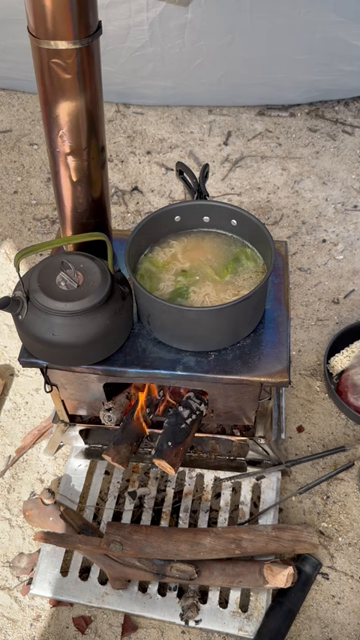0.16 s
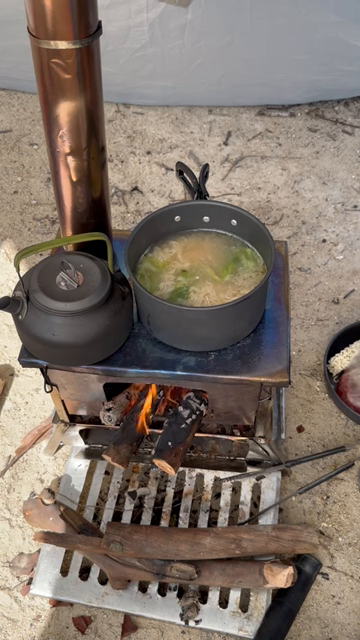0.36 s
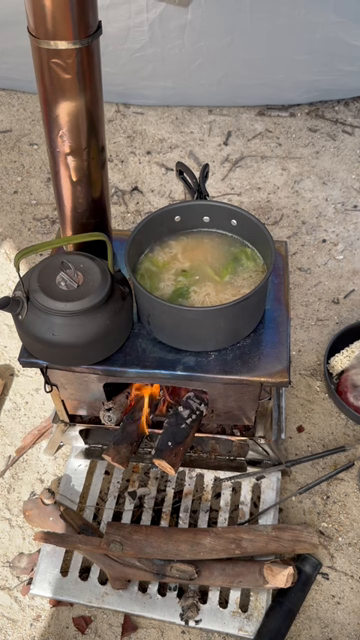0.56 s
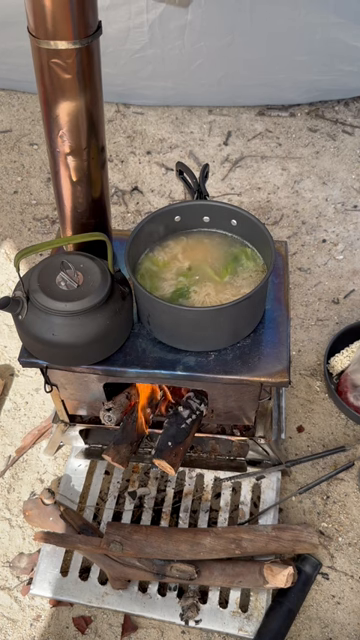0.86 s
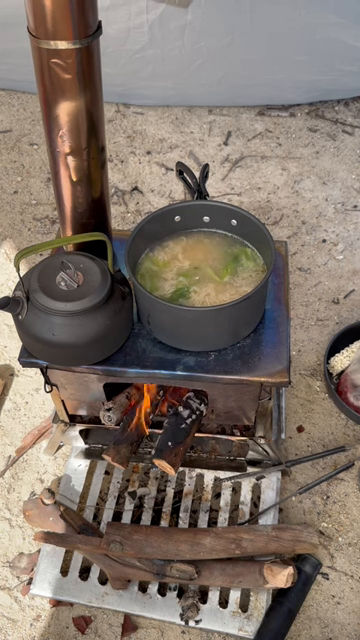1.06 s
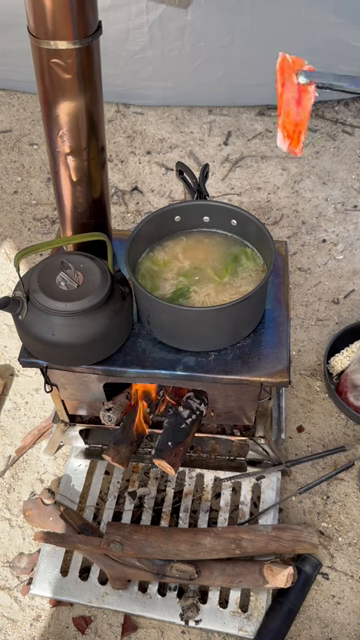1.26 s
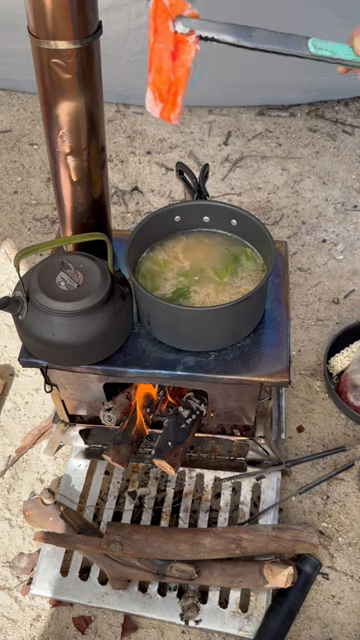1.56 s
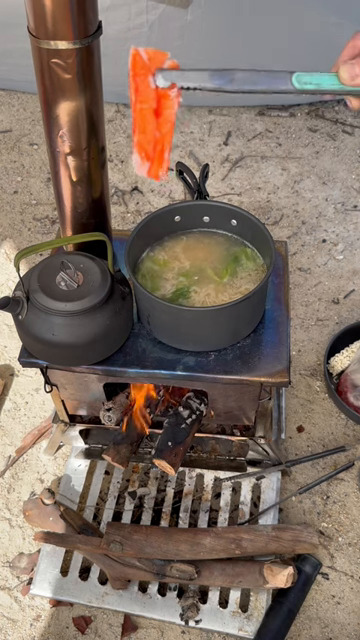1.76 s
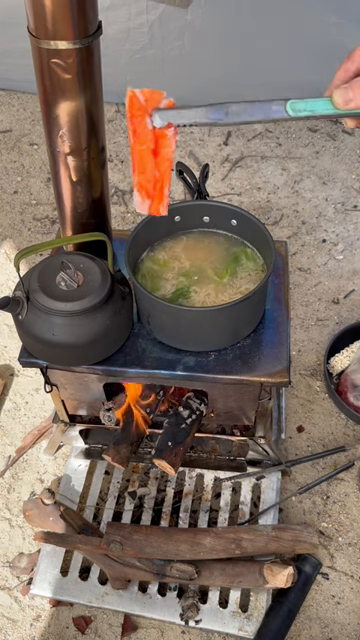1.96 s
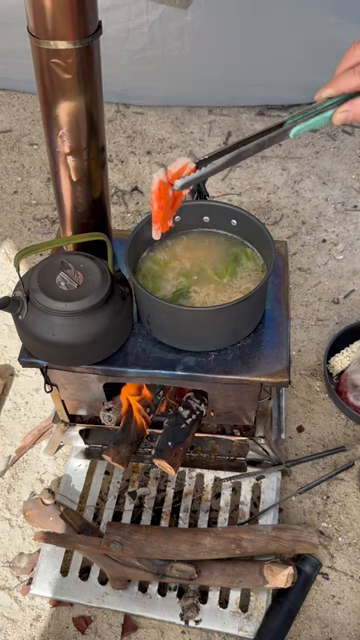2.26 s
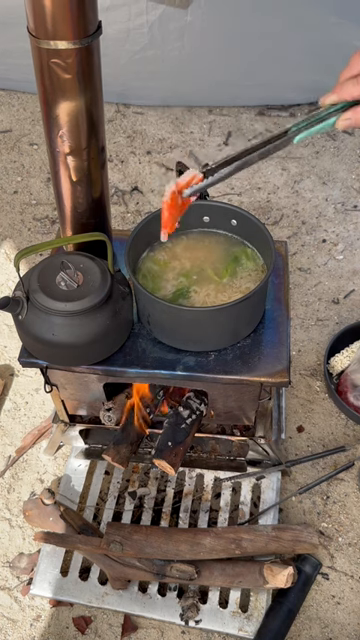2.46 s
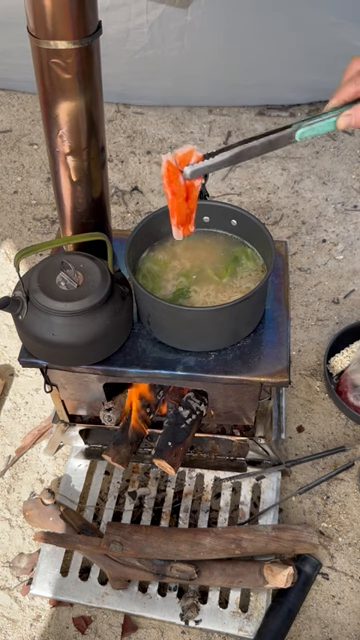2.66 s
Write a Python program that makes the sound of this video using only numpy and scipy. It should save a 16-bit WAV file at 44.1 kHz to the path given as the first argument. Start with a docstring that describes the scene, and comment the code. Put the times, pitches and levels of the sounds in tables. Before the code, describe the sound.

A low, wavering stove-fire roar with a sharp pop near the start, faint ticks and light rustling

```python
"""A low fire roar flutters and hums, cloth swishes, wood pops and ticks, and brief rough tones sound.
A wood fire draws in a small sheet-metal stove inside a tent, a phone held close above it.
Noise bands make the roar and narrow noise the flue hum; clicks over noise make the cloth.
Bursts with a metal ring and a dull tail make the pops; swept sines make the rough tones.
The bass is alike in left and right; the treble differs in phase, likeness and balance."""
import sys
import numpy as np
from scipy import signal
from scipy.fft import rfft, irfft, next_fast_len
from scipy.io import wavfile
from scipy.ndimage import uniform_filter1d

SR = 44100
rng = np.random.default_rng(int(sys.argv[2]) if len(sys.argv) > 2 else 0)


def invert_db(level):
    """Linear amplitude ratio for a level in decibels (20 dB per decade), elementwise."""
    return 10 ** (np.asarray(level, dtype=float) / 20)


def master_out(mix):
    """Clip the mix to full scale and print it as 16-bit PCM to the path in sys.argv[1]."""
    frames = np.transpose(np.atleast_2d(mix))
    ceiling = np.clip(frames, -1, 1)
    pcm = np.round(ceiling * 32767).astype(np.int16)
    wavfile.write(sys.argv[1], SR, pcm)


N = 123479  # samples
T = np.arange(N) / SR
SIZE = next_fast_len(N + SR // 2)  # transform length, with room for filter tails
HZ = np.maximum(np.fft.rfftfreq(SIZE, 1 / SR), 1)
SHARED = np.array([[1], [0]])  # puts a sound in the shared row only, not in its unrelated twin

# level of the rumble as it happens to waver, only its changes count: (t/s, level/dB)
RUMBLE_LEVEL = [(0.0, -39), (0.28, -34.5), (0.3, -34.5), (0.41, -35.5), (0.47, -44.5), (0.54, -38),
                (0.58, -50), (0.63, -34.5), (0.69, -38.5), (0.76, -36.5), (0.89, -36), (0.9, -52),
                (0.94, -41.5), (1.02, -43.5), (1.04, -34.5), (1.16, -46), (1.2, -34), (1.28, -44),
                (1.31, -32.5), (1.36, -53.5), (1.42, -30.5), (1.46, -39), (1.47, -33), (1.63, -35),
                (1.67, -45.5), (1.71, -30), (1.77, -52), (1.81, -40.5), (1.85, -38.5), (1.98, -51.5),
                (2.0, -33), (2.17, -33.5), (2.21, -40), (2.27, -51), (2.31, -37.5), (2.42, -32.5),
                (2.5, -46), (2.51, -41), (2.68, -34.5), (2.8, -51.5)]


def read(table, column, at, scale=np.asarray):
    """One column of a table, joined by straight lines."""
    rows = np.array(table, float)
    return np.interp(scale(at), scale(rows[:, 0]), rows[:, column])


def unit(x):
    """Scale to rms 1."""
    return x / np.sqrt(np.mean(x ** 2))


def shape(x, gain):
    """Filter by a gain for each frequency."""
    return irfft(rfft(x, SIZE) * gain, SIZE)[..., :N]


def colour(table):
    """Gain from (f/Hz, level/dB) points."""
    return invert_db(read(table, 1, HZ, np.log))


def walk(rate):
    """Random levels held 1 / rate s and slewed twice; spread about 0.7."""
    k = int(SR / rate)
    held = np.repeat(rng.standard_normal(N // k + 1), k)
    slewed = uniform_filter1d(uniform_filter1d(held, k), k)
    return 0.99 * slewed[:N]


def roar():
    """Flame noise in overlapping bands that swell together and flutter alone; the bass also wavers."""
    # spectrum of flame roar and the faint hiss above it: (f/Hz, relative level per Hz/dB)
    roar_colour = [(20, -31), (30, -26), (40, -18), (50, -8), (70, -5.5), (100, -8), (150, -13.5),
                   (220, -18.5), (350, -24), (520, -23), (800, -25), (1100, -31), (1500, -41.5),
                   (2200, -49.5), (3000, -49.5), (4500, -54.5), (7000, -52.5), (10500, -58), (12500, -56),
                   (16000, -72)]
    roar_db, swell_db, flutter_db = -40, -0.5, 1.32  # overall rms; dB per unit of walk
    rumble = read(RUMBLE_LEVEL, 1, T)
    rumble = rumble - rumble.mean()
    swell = walk(1.81)
    out = 0
    for hz in 22 * 2 ** np.arange(0, 10, .5):
        octaves = np.clip(np.log2(HZ / hz), -.5, .5)
        band = np.cos(np.pi * octaves) * colour(roar_colour)
        db = swell_db * swell + flutter_db * walk(8.91)
        db = db + 0.35 * rumble * (hz < 90)
        out = out + invert_db(db) * shape(rng.standard_normal((2, N)), band)
    return unit(out) * invert_db(roar_db)


def flue_hum():
    """Air in firebox and flue resonates: narrow noise, its level partly steadied."""
    # air resonances of firebox and flue: (f/Hz, width/Hz, rms level/dB, steadiness 0-1)
    resonances = [(60.9, 14.9, -38.5, 0.66), (130.87, 2.8, -48, 1), (170.8, 5.3, -60, 0),
                  (605.9, 12, -58, 0.53)]
    # how strongly the upper resonances sound, scaled by hum_share below: (t/s, level/dB)
    hum_levels = [(0.0, -67), (0.06, -58.5), (0.28, -66.5), (0.57, -58), (0.78, -59.5), (0.81, -79),
                  (0.88, -63), (1.63, -63), (1.64, -73), (1.75, -59.5), (2.7, -62.5), (2.8, -59)]
    hum_share, waver_db = 0.73, 1.5  # share of the dB curve; dB per unit of walk
    rumble = read(RUMBLE_LEVEL, 1, T)
    rumble = rumble - rumble.mean()
    out = 0
    for hz, width, db, steady in resonances:
        peak = 1 / (1 + (2 * (HZ - hz) / width) ** 2)
        narrow = unit(shape(rng.standard_normal((2, N)), peak))
        air = signal.hilbert(narrow, SIZE)[:, :N]
        # dividing by the envelope steadies the tone
        air = (air / (abs(air) + 0.031) ** np.clip(steady, 0, 1)).real
        if hz < 90:
            strength = rumble
        else:
            strength = hum_share * read(hum_levels, 1, T) + waver_db * walk(6.81)
        air = air * invert_db(strength)
        # trim the sidebands that the level changes add
        air = unit(shape(air, 1 / (1 + ((HZ - hz) / (1.53 * width)) ** 4)))
        out = out + air * invert_db(db)
    return out


def cloth():
    """Threads slip past each other: dense tiny clicks over a smooth swish."""
    # cloth moving: (t/s, high rustle level/dB, low rustle level before a 7 dB cut, relative to high/dB)
    moves = [(0, -70.5, 9.5), (.3, -68, 10.5), (.34, -65, 12.5), (.39, -53.5, 6), (.45, -57, 2),
             (.52, -65, 1), (.575, -56.5, 3.5), (.6, -54, -19), (.62, -64.5, 1), (.69, -53.5, -4),
             (.725, -50, 0), (.8, -54, 1), (.84, -66.5, 5), (.9, -63, -3.5), (1.17, -68.5, 6.5),
             (1.27, -60, 1), (1.5, -57.5, -6), (1.85, -62, -3.5), (2.0, -61, -6), (2.1, -75.5, 2),
             (2.8, -66.5, 7)]
    # spectrum of the high rustle: (f/Hz, relative level per Hz/dB)
    high_colour = [(2000, -17), (4500, -7.5), (5500, 0.5), (8000, -1), (10300, 1.5), (11800, -13),
                   (16000, -4)]
    # spectrum of the low rustle: (f/Hz, relative level per Hz/dB)
    low_colour = [(900, -31), (1800, -1), (2600, 1), (4000, -3.5), (5500, -7)]
    grains_per_s, grain_spread_db, grain_db = 2500, 2.2, -2  # grain_db is relative to the swish
    grains = (rng.random((2, N)) < grains_per_s / SR) * rng.standard_normal((2, N))
    grains = grains * invert_db(grain_spread_db * rng.exponential(size=N))
    rub = rng.standard_normal((2, N)) + invert_db(grain_db) * unit(grains)
    high = unit(shape(rub, colour(high_colour)))
    low = unit(shape(rub, colour(low_colour)))
    level_db = read(moves, 1, T) + 1.44 * walk(59.81)
    return invert_db(level_db) * (high + invert_db(read(moves, 2, T) - 7.0) * low)


def stove_ring(t):
    """The stove walls ring as a chord of decaying sines."""
    # modes of the stove walls: (f/Hz, relative level/dB, t60/s)
    modes = [(1090, -1, 0.039), (1630, -12, 0.034), (1850, -6.5, 0.032), (2260, -14, 0.016),
             (2413, 1.5, 0.019), (2700, -2, 0.021), (2910, -3.5, 0.021), (3490, -7, 0.019),
             (3820, -3.5, 0.029)]
    ring = sum(invert_db(db - 60 * t / t60) * np.sin(2 * np.pi * hz * t) for hz, db, t60 in modes)
    return unit(ring) * invert_db(-25)


def place(x, s):
    """Put a short sound at s seconds."""
    return np.pad(x, ((0, 0), (int(s * SR), N)))[:, :N]


def pops():
    """A steam pocket bursts and wood splinters; stove walls ring, the tent returns a brief dull tail."""
    # pops of the wood: (t/s, level/dB, centre f/Hz, crack decay time/ms, answer of stove and tent/dB)
    pop_list = [(0.1576, -36, 4500, 2.2, -25), (0.1654, -17, 2700, 3, -8), (0.1694, -28.5, 3030, 2, -8),
                (0.2106, -33, 2800, .7, -14), (0.2481, -28, 3200, 0.96, -11), (.251, -29.5, 1800, 1.3, -14),
                (0.2654, -36, 9500, .6, -20), (.338, -50, 4000, 1, -20), (.3765, -36, 7000, 1.7, -18),
                (.4775, -40, 7000, 1.5, -20), (0.571, -41, 4000, 1.5, -13), (.596, -39, 7500, 1.5, -23),
                (1.43, -41, 8000, 1.2, -25), (1.786, -39, 8000, 0.95, -13), (1.913, -43, 9500, 2.4, -20),
                (2.006, -27, 10500, 0.51, -15), (2.114, -38, 12500, 0.36, -13), (2.224, -48, 9000, .6, -25),
                (2.579, -41.5, 9550, 1.5, -10), (2.7205, -45, 9000, 1.3, -20),
                (2.783, -38.5, 9000, 1.1, -21)]
    # colour of a crack: (f/Hz, level/dB)
    wood_colour = [(500, -36), (1100, 9), (1600, -6), (2600, 2.5), (3800, -2), (5000, 4), (8000, 7.5),
                   (10500, 8), (12500, 7), (16000, 3)]
    burst_db, splinter_db = -2, -10
    tent_db, tent_t60_s, tent_rise_s, tent_hz = -6, 0.14, 0.00095, 7300
    focus_octaves = 1.17  # distance from a crack's centre at which its gain halves
    ring_slope_db = -1  # per octave: brighter cracks ring the stove less
    t = T[:SR // 4]
    ring = stove_ring(t)
    open_gain = colour(wood_colour)
    dull = 1 / (1 + (HZ / tent_hz) ** 2)
    out = 0
    for s, db, hz, ms, answer_db in pop_list:
        noise = rng.standard_normal((2, 2, len(t)))
        splinter = noise[0] * np.exp(-t * 1000 / ms) * invert_db(splinter_db)
        burst = SHARED * (t == 0) * invert_db(burst_db)  # a single-sample click
        tail = noise[1] * invert_db(tent_db - 60 * t / tent_t60_s) * (1 - np.exp(-t / tent_rise_s))
        focus = open_gain / (1 + (np.log2(HZ / hz) / focus_octaves) ** 2)
        crack = shape(place(splinter + burst, s), focus)
        tent = shape(place(tail, s), focus * dull)
        rung = place(SHARED * ring, s) * invert_db(ring_slope_db * np.log2(hz / 2700))
        out = out + invert_db(db) * (crack + invert_db(answer_db) * (tent + rung))
    return out


def rough_tones():
    """High whistles, likely of steam, and one low tone: rising sines with unsteady level and phase."""
    # brief tones: (centre t/s, f at centre/Hz, peak level before wavering/dB, half-length to 1/e/ms)
    tones = [(1.054, 4020, -66, 4), (1.157, 3900, -61, 9.9), (1.743, 3920, -59.5, 8), (2.02, 507, -52, 30)]
    rise_per_s = 1.9  # share of its centre pitch that a tone gains per second
    out = 0
    for s, hz, db, ms in tones:
        t = T - s
        turns = hz * (1 + rise_per_s * t / 2) * t
        level = invert_db(db + 3.3 * walk(hz / 7)) * np.exp(-(t * 1000 / ms) ** 2)
        out = out + level * np.sin(2 * np.pi * turns + 1.2 * walk(hz / 8))
    return SHARED * out


def stereo_image(shared, twin):
    """Mix a shared sound and its twin into left and right by likeness, then part them in phase and level."""
    # stereo phase, likeness and balance by frequency, nearly reached:
    # (f/Hz, phase lead of right/rad, likeness 0-1, left minus right/dB)
    image = [(25, .002, 1, 0), (70, .008, 1, 0), (110, .025, .9998, 0), (200, .15, .985, .6),
             (300, .45, .95, .9), (400, 1, .85, .5), (500, 1.5, .82, -3.2), (800, 2.1, .72, -6.5),
             (1250, 2, .5, -7), (1500, .6, .6, -3.5), (1900, .1, .92, 0), (2150, .1, .92, .5),
             (2500, .8, .85, -.5), (3000, .5, .66, 1), (4000, .7, .8, -1.5), (4600, .8, .4, 0),
             (5000, 3.8, .5, 0), (5400, 5.8, .75, 0), (5750, 2 * np.pi, 1, 0), (6800, 2 * np.pi, 1, 0),
             (7100, 6.7, .86, 0), (8000, 7.3, .82, 0), (10000, 8.3, .78, 0), (10800, 8.8, .75, 0),
             (11200, 3 * np.pi, 1, 0), (14600, 3 * np.pi, 1, 0), (15000, 10, .75, 0), (15800, 10.2, .65, 0)]
    lead, like, pan_db = (read(image, k, HZ, np.log) for k in (1, 2, 3))
    like = np.clip(like, 0, 1)
    same = np.sqrt((1 + like) / 2)
    other = np.sqrt((1 - like) / 2)

    def side(sign):
        """One channel: negative sign is left, positive is right."""
        mixed = shape(shared, same) - sign * shape(twin, other)
        return shape(mixed, invert_db(-sign * pan_db / 2) * np.exp(sign * .5j * lead))

    return np.array([side(-0.99), side(1)])


def scene():
    """Add the sources, each a shared sound and an unrelated or silent twin, and spread them in stereo."""
    shared, twin = roar() + flue_hum() + cloth() + pops() + rough_tones()
    return stereo_image(shared, twin)


def band_limit(x):
    """A steep low-pass at the top of the band."""
    return signal.sosfilt(signal.butter(12, 16570, fs=SR, output="sos"), x)


def record(dry):
    """The phone cuts everything from 15950 Hz up."""
    mix = shape(dry, 1. * (HZ < 15950))
    return band_limit(mix)


dry = scene()
out = record(dry)
master_out(out)
```